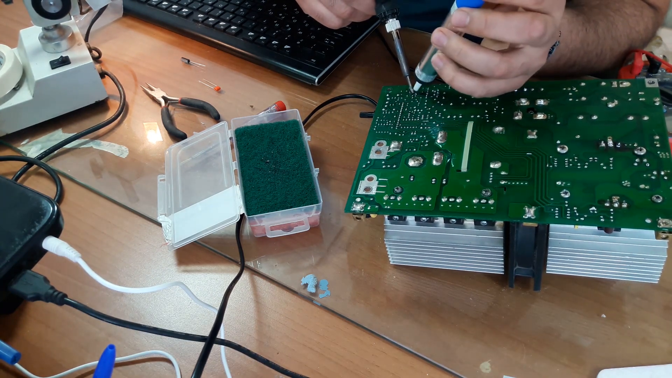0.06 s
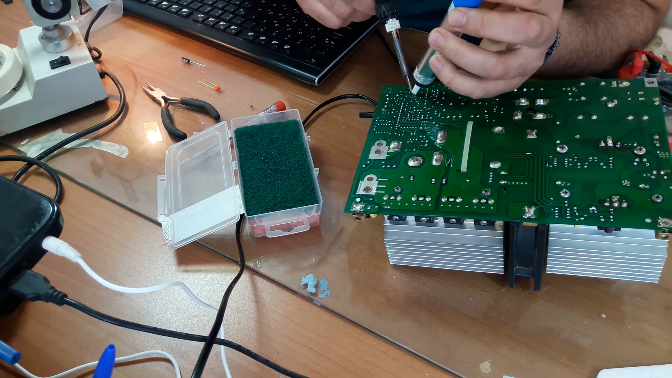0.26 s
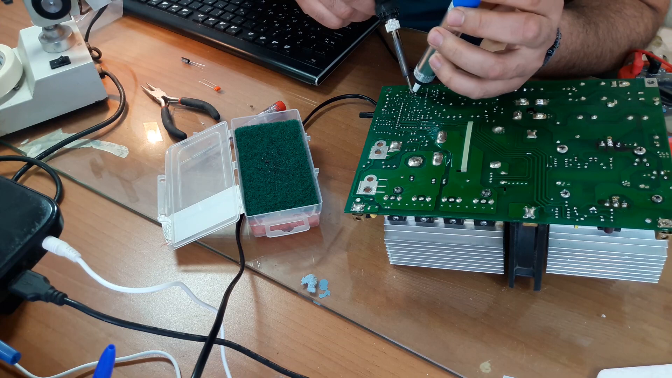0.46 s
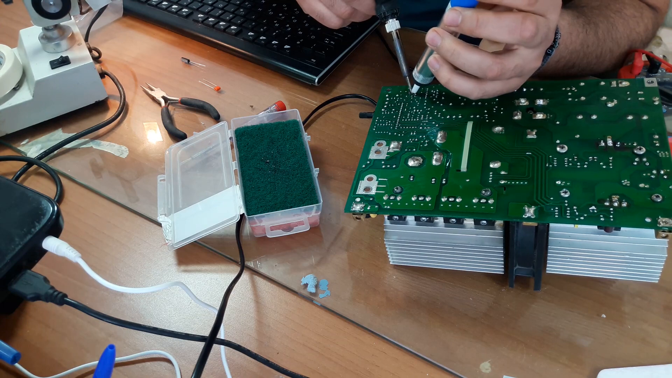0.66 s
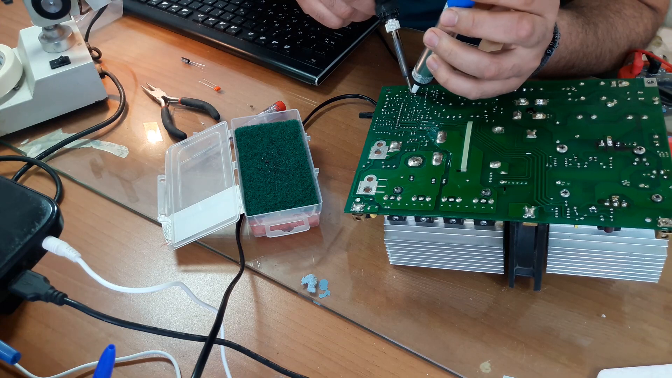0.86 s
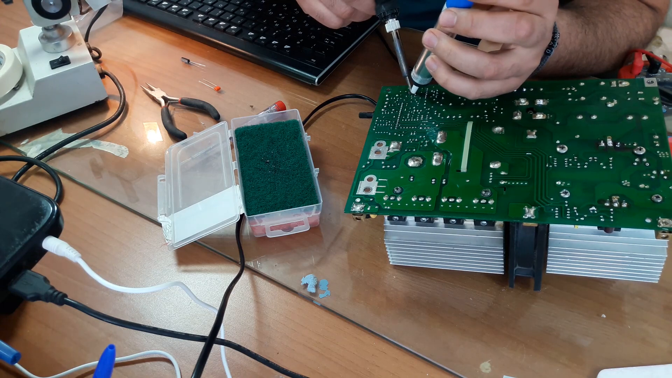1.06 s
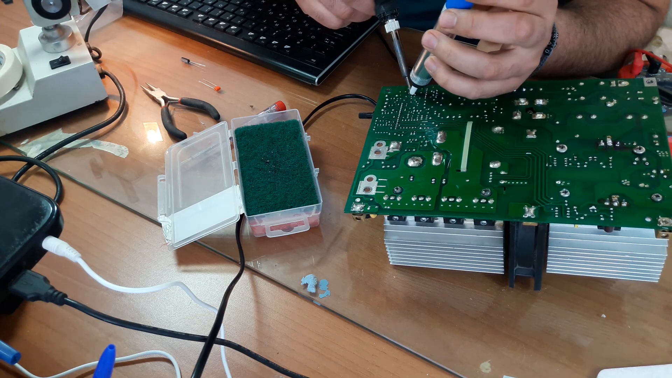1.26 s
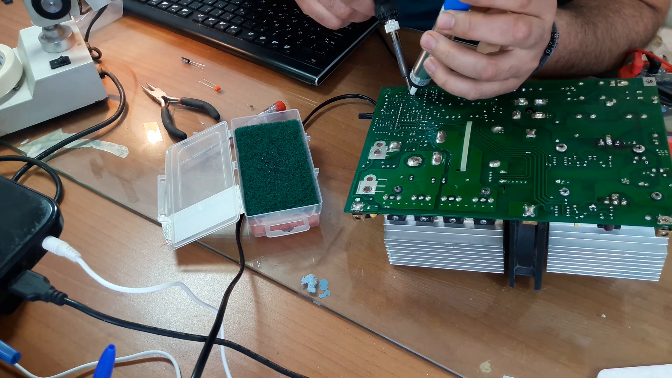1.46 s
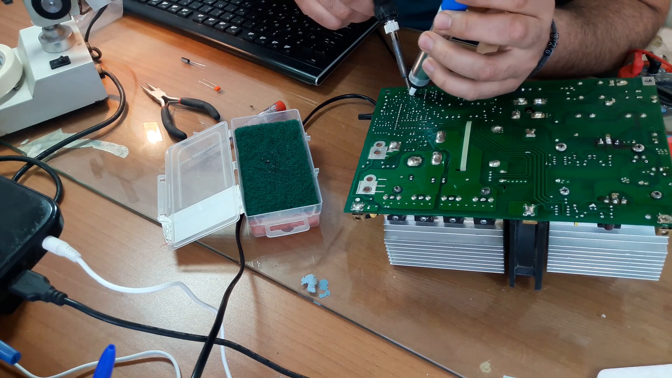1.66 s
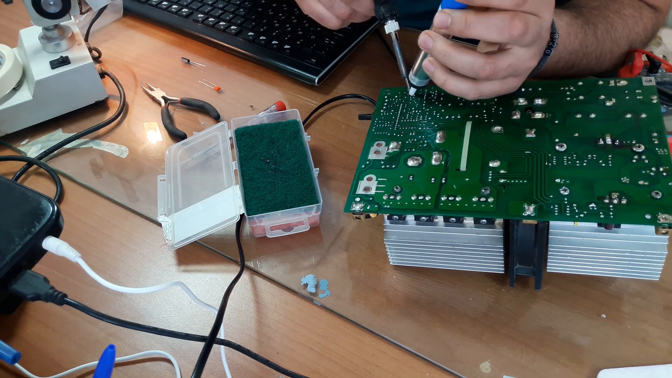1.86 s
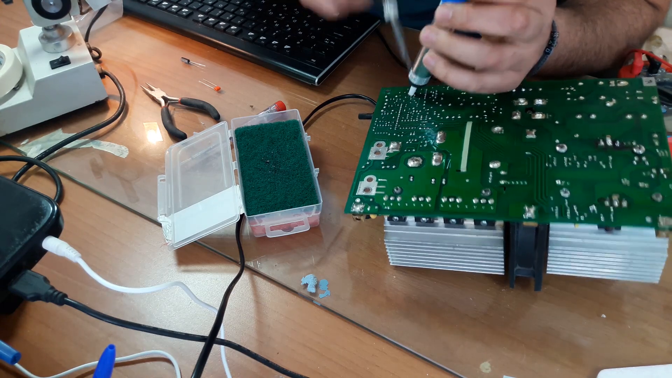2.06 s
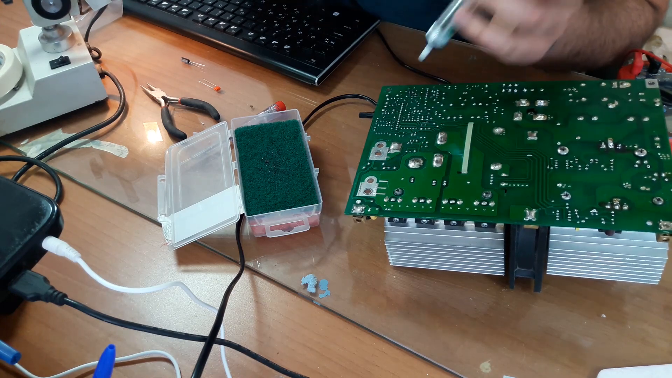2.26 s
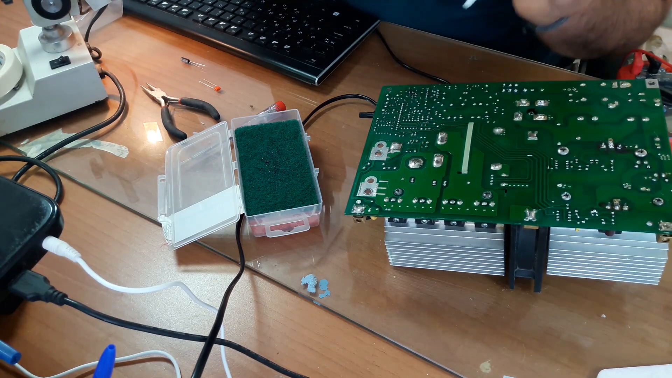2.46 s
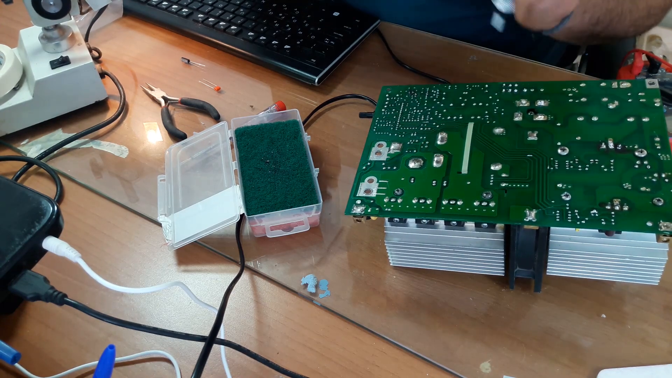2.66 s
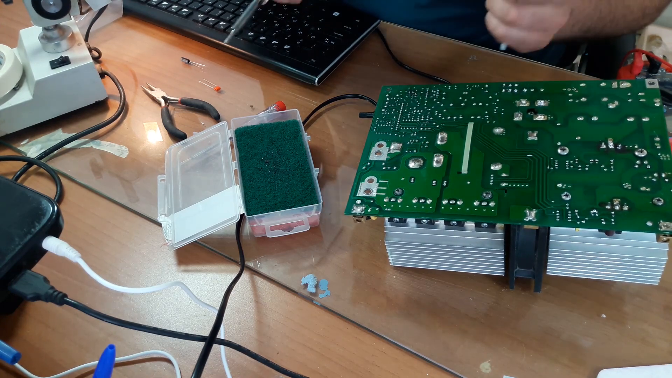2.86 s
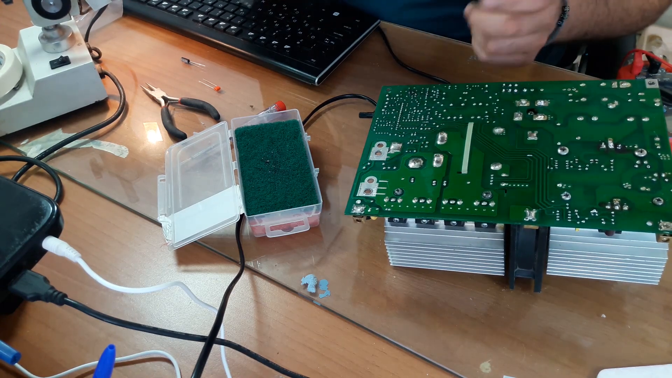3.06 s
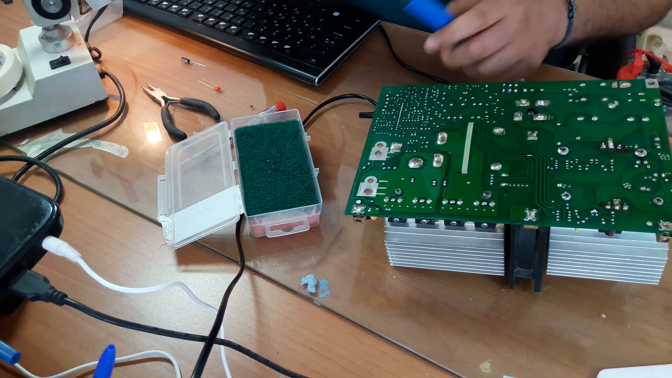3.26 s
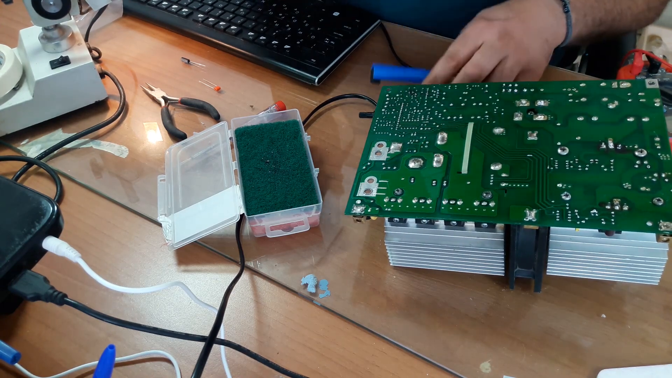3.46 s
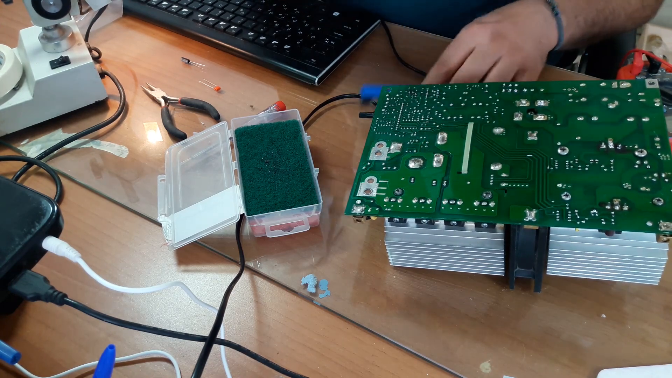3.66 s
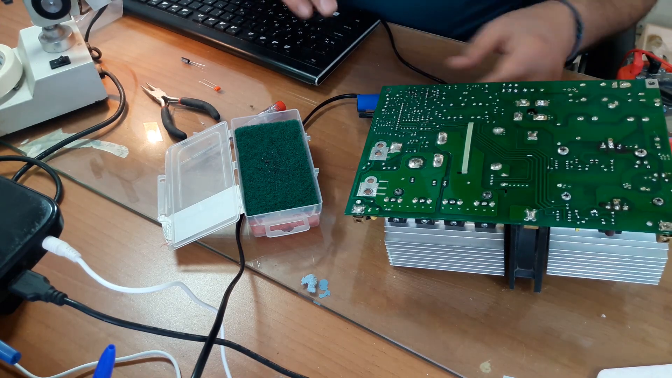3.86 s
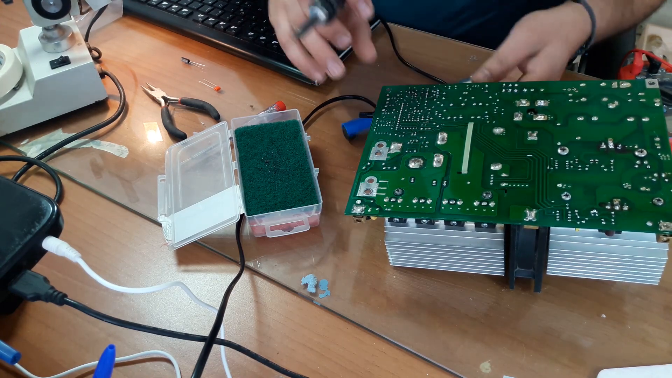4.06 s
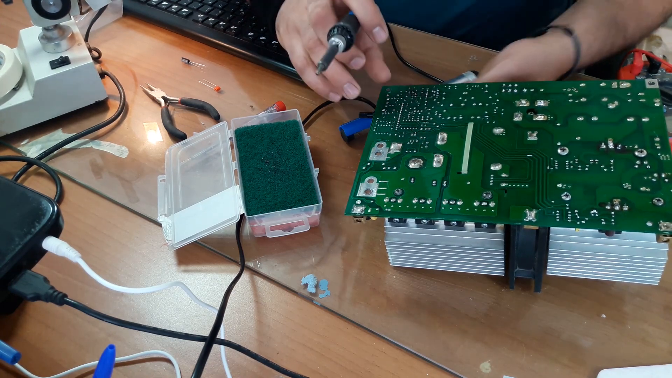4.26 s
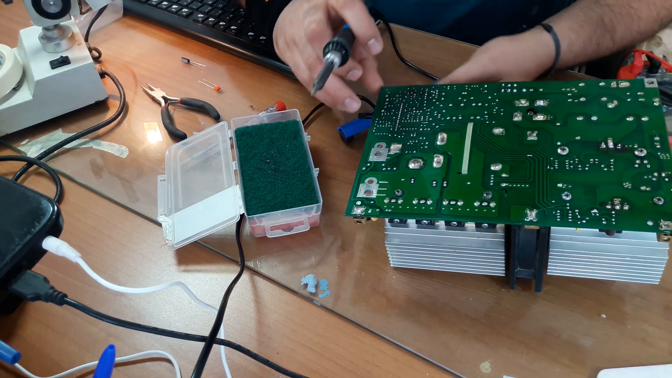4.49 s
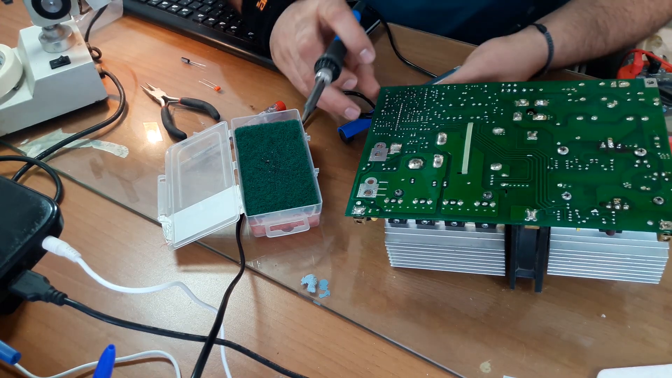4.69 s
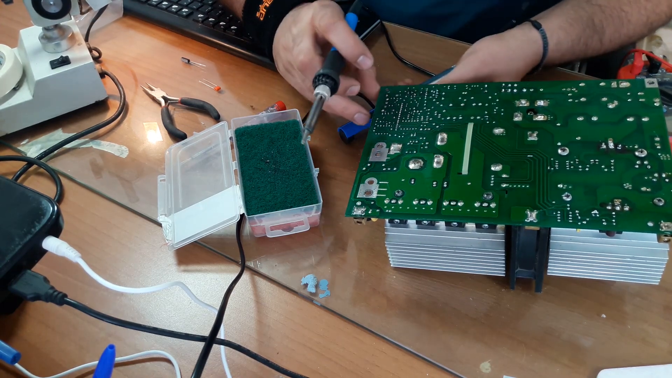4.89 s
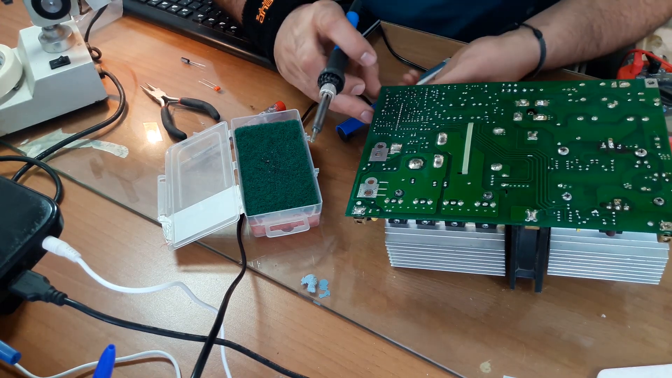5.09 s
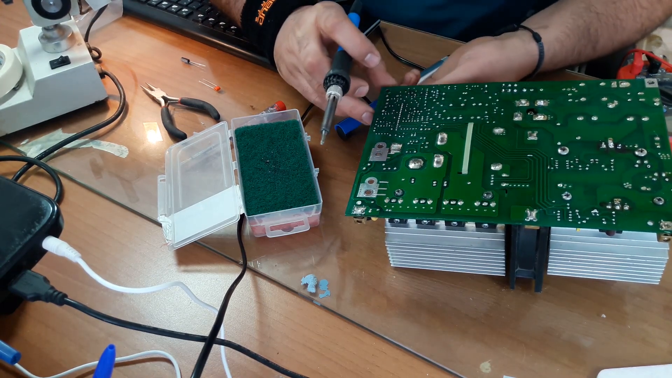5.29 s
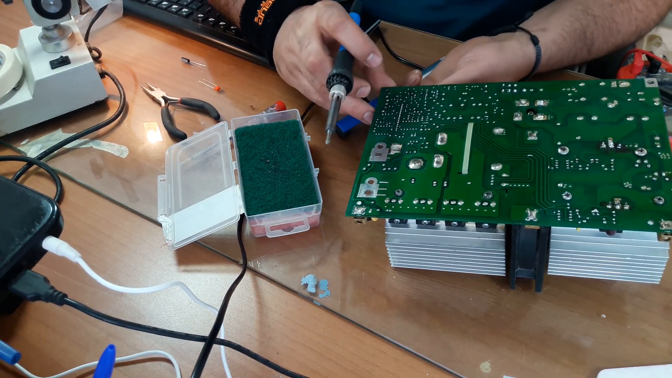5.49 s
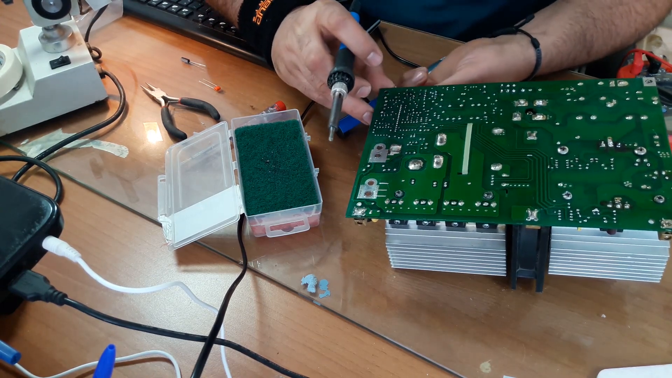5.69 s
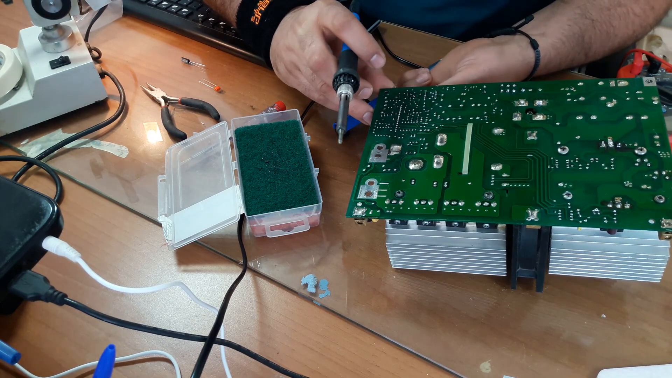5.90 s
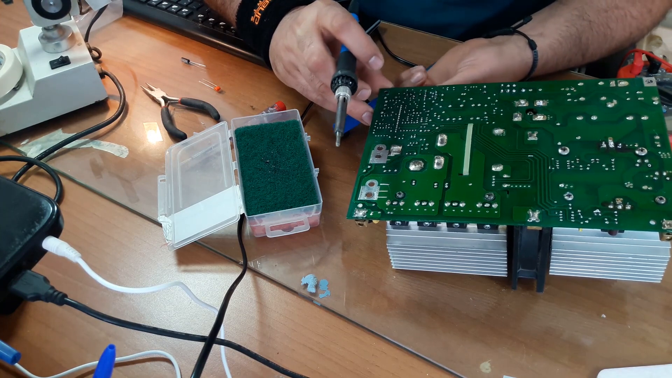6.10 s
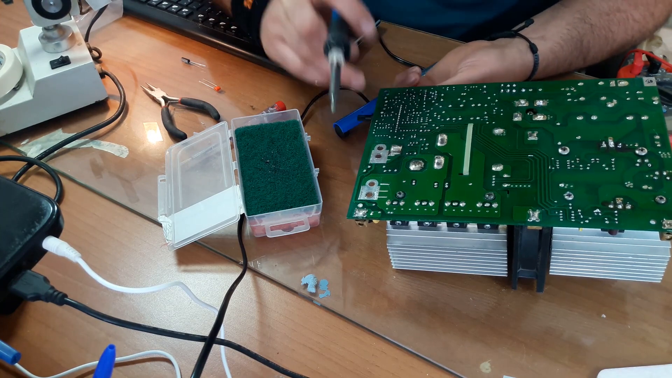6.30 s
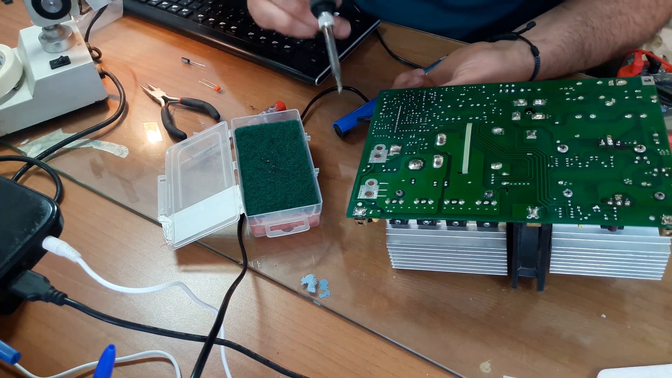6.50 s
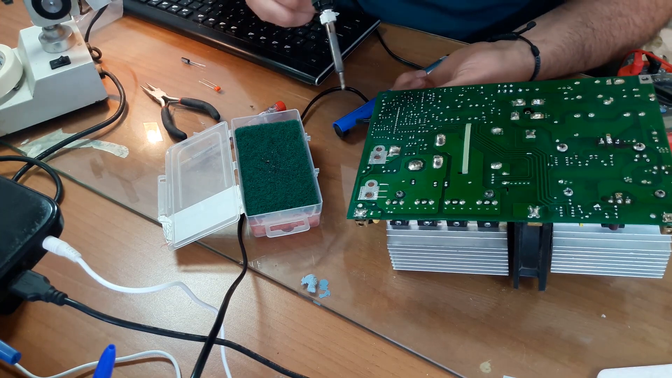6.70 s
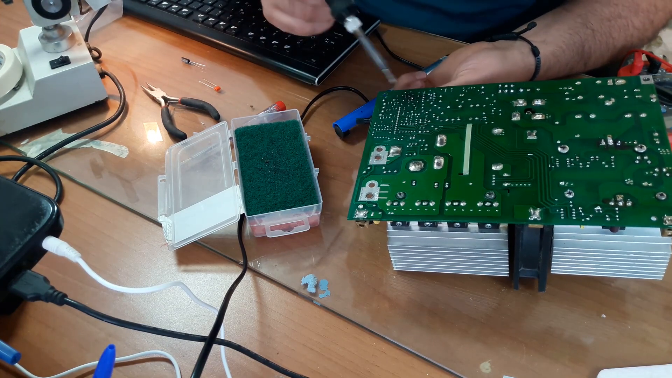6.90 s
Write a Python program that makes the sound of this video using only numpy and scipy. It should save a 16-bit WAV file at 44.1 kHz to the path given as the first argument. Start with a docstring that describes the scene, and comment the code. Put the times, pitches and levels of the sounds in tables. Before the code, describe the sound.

Close stereo microphone in a small hard room. Two seconds of faint low hum and air, then a spring plunger releases with a very loud, sharp clack and short room ring. Soft dull pushes re-cock it, it is laid on the desk with a hollow knock, and another tool is picked up with small clicks, a board knock and faint metallic pings before quiet returns.

```python
"""At a workbench in a small hard room, a spring-loaded solder sucker is fired close to a two-port microphone.
The catch rattles free and the plunger slams its stop; it is pushed in again and laid on the desk.
A tool is picked up with small clicks, ticks, knocks and pings: each blow is a push with chatter that rings
a coloured body, answered by wall echoes and a diffuse tail. Under all lie shaped noise for a wavering
low hum, room air, rustle and microphone hiss, and a few brief narrow whistles and scrapes."""
import sys
import numpy as np
from scipy import signal
from scipy.fft import rfft, irfft, next_fast_len
from scipy.io import wavfile
from scipy.ndimage import uniform_filter1d

SR = 44100
rng = np.random.default_rng(int(sys.argv[2]) if len(sys.argv) > 2 else 0)


def wrap_up_sound(samples):
    """Save the sound to the file named by the first command line argument, as 16-bit audio."""
    columns = np.atleast_2d(samples).T
    # keep every value between -1 and 1, then stretch to whole-number steps
    tamed = np.clip(columns, -1, 1)
    steps = np.round(tamed * 32767).astype(np.int16)
    wavfile.write(sys.argv[1], SR, steps)


def gain_from_db(level_db):
    """Convert decibel levels to linear amplitude factors (20 dB per decade)."""
    decades = np.asarray(level_db, float) / 20
    return 10 ** decades


N = 306142  # samples in the scene
LEFT_DB = -0.9  # the left port is a little less sensitive: this on the left, its opposite on the right


def unit(x):
    """Scaled to rms 1."""
    return x / np.sqrt(np.mean(x ** 2) + 1e-20)


def along(points, hz):
    """A curve through (Hz, value) points, straight on a log frequency axis."""
    f, v = np.transpose(points)
    return np.interp(np.log(hz + 1), np.log(f + 1), v)


def curves(rows):
    """One value per sample for each column after the time."""
    s, *columns = np.transpose(rows)
    t = np.arange(N) / SR
    return [np.interp(t, s, column) for column in columns]


def filtered(x, response):
    """x times a complex response of frequency."""
    n = x.shape[-1]
    m = next_fast_len(n + 8192)
    hz = np.fft.rfftfreq(m, 1 / SR)
    return irfft(rfft(x, m) * response(hz), m)[..., :n]


def resonance(hz, width, f):
    """Complex response of one damped mode, 1 at its centre."""
    return 1j * f * width / (hz * hz - f * f + 1j * f * width)


def causal(gain):
    """Minimum-phase impulse response for a gain given on an FFT grid."""
    n = len(gain) - 1
    cepstrum = irfft(np.log(gain + 1e-6))
    cepstrum[1:n] *= 2
    cepstrum[n + 1:] = 0
    return irfft(np.exp(rfft(cepstrum)))[:n]


def pair(n):
    """Diffuse sound at two ports: noises that agree in the bass and part in the treble."""
    # left-right likeness of diffuse sound: [f/Hz, correlation]
    likeness = [(60, 0.93), (130, 0.94), (290, 0.81), (640, 0.58), (1410, -0.16), (3100, -0.01),
                (6820, -0.03), (15000, -0.04)]

    def mid_and_side(hz):
        angle = np.arccos(np.clip(along(likeness, hz), -1, 1)) / 2
        return np.array([np.cos(angle), np.sin(angle)])

    mid, side = filtered(rng.standard_normal((2, n)), mid_and_side)
    return np.array([mid + side, mid - side])


def rush(spectrum, patchy_db):
    """Stereo noise of rms 1, shaped in frequency, with patches of random gain."""
    hz, _, z = signal.stft(pair(N), SR, nperseg=1024)
    patches = uniform_filter1d(rng.standard_normal(z.shape[1:]), 5, 0)
    patches = uniform_filter1d(patches, 6, 1)
    z = z * gain_from_db(along(spectrum, hz)[:, None] + patchy_db * unit(patches))
    return unit(signal.istft(z, SR, nperseg=1024)[1][:, :N])


def narrow(hz, width, n):
    """Stereo noise of rms 1 passed twice through one resonance."""
    return unit(filtered(pair(n), lambda f: resonance(hz, width, f) ** 2))


def contact(chatter_ms, rattle, n):
    """A sharp push and a brief chatter after it, evened out to a flat broad spectrum."""
    ms = np.arange(n) / SR * 1000
    fade = gain_from_db(-20 * (ms / max(chatter_ms, 0.2)) ** 2)
    force = rattle * rng.standard_normal(n) * fade
    force[0] = -1
    broad_power = uniform_filter1d(np.abs(rfft(force, 2 * n)) ** 2, size=80)
    return signal.fftconvolve(force, causal(np.abs(broad_power) ** -0.5))[:n]


def room(n, rise_ms):
    """A diffuse tail that builds up and dies band by band, with a weaker, slower remainder; left energy 1."""
    # decay time of the room: [f/Hz, t60/s]
    decay = [(100, 0.51), (260, .5), (700, 0.45), (1840, 0.5), (4850, 0.49), (12800, .26)]
    # colour of the tail: [f/Hz, gain/dB]
    tail_tone = [(100, 0), (300, 3), (800, 1), (1800, 1.5), (4000, -0.5), (8000, -5.5), (15000, -5.5)]
    late_db, late_pace = -18, 0.47  # start of the remainder; its share of the first decay rate
    hz, t, z = signal.stft(pair(n), SR, nperseg=256)
    fade_db = -60 * t / along(decay, hz)[:, None]
    fade = gain_from_db(fade_db) + gain_from_db(late_db + late_pace * fade_db)
    tone = gain_from_db(along(tail_tone, hz)[:, None])
    tail = signal.istft(z * tone * fade, SR, nperseg=256)[1][:, :n]
    ms = np.arange(n) / SR * 1000
    tail = tail * (1 - np.exp(-(ms / rise_ms) ** 2))
    return tail / np.linalg.norm(tail[0])


def peaks(modes, f):
    """Summed gain of the modes of a struck body."""
    return sum(gain_from_db(db) * np.abs(resonance(hz, width, f)) ** 2 for hz, width, db in modes)


def ports(pan_db, lag_ms, n):
    """Direct path and early wall echoes as impulse responses at the left and right port."""
    # early wall echoes: [delay/ms, level/dB]
    walls = [(4, -16), (7.3, -20), (11, -23), (21, -19), (27, -26.5)]
    near = np.zeros((2, n))
    for delay_ms, wall_db in walls:
        scatter = rng.integers(0, 12, size=2)  # samples, each port its own
        near[[0, 1], round(delay_ms * SR / 1000) + scatter] = gain_from_db(wall_db)
    near = filtered(near, lambda f: 1 / (1 + 1j * f / 3500))  # walls return little treble
    near[:, 0] = 1
    # the sound reaches the right port first
    near[0] = filtered(near[0], lambda f: np.exp(-2j * np.pi * f * lag_ms / 1000))
    # pan_db is left over right, with the port sensitivities taken out
    return near * gain_from_db([[pan_db / 2 - LEFT_DB], [LEFT_DB - pan_db / 2]])


def blows(events, body, pan_db, room_db, lag_ms, rattle, modes=(), sideways=()):
    """Each contact rings the body; walls and room answer anew each time."""
    n, short = SR * 3 // 4, SR // 8
    out = np.zeros((2, N + n))
    f = np.fft.rfftfreq(2 * short, 1 / SR)
    colour = gain_from_db(np.maximum(along(body, f), -130)) + peaks(modes, f)
    far_colour = colour + peaks(sideways, f)
    onset = 1 - np.exp(-np.arange(1, short + 1) / SR / 0.0002)  # the contact stiffens over its first instant
    for s, db, chatter_ms, tilt_db in events:
        slope = gain_from_db(tilt_db * np.log2(np.clip(f, 200, 16000) / 1000))
        push = contact(chatter_ms, rattle, short)
        ring = signal.fftconvolve(push, causal(colour * slope))[:short] * onset
        ring = gain_from_db(db) * ring / np.abs(ring).max()
        near = ports(pan_db, lag_ms, short)
        far = causal(far_colour * slope)
        # room_db: what is sent to the room against the ring, in energy
        far = far * gain_from_db(room_db) * np.linalg.norm(ring) / np.linalg.norm(far)
        here = out[:, round(s * SR):]
        here[:, :short] += signal.fftconvolve(ring[None], near, axes=1)[:, :short]
        here[:, :n] += signal.fftconvolve(far[None], room(n, rise_ms=11.0), axes=1)[:, :n]
    return out[:, :N]


# In the blow tables below, level is the peak of the ring before panning,
# chatter the time in which the rattling falls 20 dB, tilt a slope about 1 kHz.


def low_hum(hum_db):
    """Rumble and hum as shaped noise, with three wavering tones as narrow noise bands."""
    # rumble colour: [f/Hz, gain/dB]
    rumble_colour = [(25, -63), (35, -26), (41, 0.5), (55, 0), (70, -15), (120, -60)]
    # hum colour: [f/Hz, gain/dB]
    hum_colour = [(45, -61), (58, -18), (70, -14), (91, -1), (151, -3), (221, -11.5), (260, -24),
                  (340, -47.5)]
    # wavering of the three tones: [t/s, low level/dB, middle level/dB, high level/dB]
    wavering = [(0.0, -78, -59, -57.5), (0.7, -73, -59.5, -60), (1.5, -65.5, -62, -76.5),
                (2.2, -63.5, -57, -70), (2.8, -74, -81, -78), (4.601, -74, -71.5, -69.5),
                (5.1, -74, -73, -75), (5.5, -67, -65, -72.5), (6.43, -66, -57, -78.5),
                (6.94, -70, -77, -63)]
    # the three tones, low to high: [f/Hz, width/Hz]
    tones = [(102, 2.8), (143, 16), (166, 17)]
    drone = sum(gain_from_db(db) * narrow(hz, width, N) for db, (hz, width) in zip(curves(wavering), tones))
    rumble = gain_from_db(-67) * rush(rumble_colour, patchy_db=0.5)
    return drone + rumble + gain_from_db(hum_db) * rush(hum_colour, patchy_db=2.0)


def room_air(air_db):
    """Air and a patchier rustle, shaped noises that rise and fall together."""
    # air colour: [f/Hz, gain/dB]
    air_colour = [(120, -29.5), (200, 3), (220, -10), (300, -3.5), (529, -9), (642, -10), (700, -8.5),
                  (2000, -19.5), (2600, -53), (4400, -120)]
    # rustle colour: [f/Hz, gain/dB]
    rustle_colour = [(710, -27), (1200, -7.5), (2210, -5.5), (2990, -10), (3500, -11.5), (5380, -20),
                     (8000, -25.5), (10400, -51), (17600, -120)]
    rustle = gain_from_db(-8.5) * rush(rustle_colour, patchy_db=2.1)  # against the air
    return gain_from_db(air_db) * (rush(air_colour, patchy_db=0.4) + rustle)


def hiss():
    """Steady microphone hiss, mostly treble."""
    # hiss colour: [f/Hz, gain/dB]
    hiss_colour = [(2940, -30.5), (5000, -10), (8750, -10.5), (11500, 0), (15100, 3), (16000, -6)]
    return gain_from_db(-77) * rush(hiss_colour, patchy_db=0.3)


def background():
    """The place at rest: hum and air follow slow level curves over steady hiss."""
    # levels of the place, rms: [t/s, hum level/dB, air level/dB]
    bed = [(0.0, -56, -62.5), (0.4, -62.5, -63), (1.9, -62, -63.5), (2.2, -55.5, -59.5),
           (2.8, -58.5, -61.5), (3.35, -63.5, -61.5), (3.9, -59.5, -60.5), (4.2, -54.5, -59.5),
           (4.65, -61, -59.5), (5.0, -59, -62), (6.0, -61, -62.5), (6.7, -60, -61), (6.94, -57, -61.5)]
    hum_db, air_db = curves(bed)
    return low_hum(hum_db) + room_air(air_db) + hiss()


def whistles():
    """Brief whistles and scrapes: narrow bands of noise that swell, hold and fade."""
    # whistles and scrapes: [start t/s, held until t/s, f/Hz, width/Hz, level/dB]
    bands = [(1.7, 1.848, 487, 23, -69), (2.478, 2.6, 6600, 550, -75.5), (2.6, 2.68, 4750, 500, -78),
             (2.6, 2.68, 2450, 250, -71.5), (3.57, 3.66, 6000, 140, -82.5), (5.95, 6.115, 528, 43, -65.5),
             (6.58, 6.77, 524, 14, -65), (6.63, 6.68, 2700, 1200, -69)]
    swell_s, fade_db_per_s = 0.015, 62
    n = SR // 2
    out = np.zeros((2, N + SR))
    t = np.arange(n) / SR
    for start, held, hz, width, db in bands:
        swell = np.minimum(t / swell_s, 1)
        fade = gain_from_db(db - fade_db_per_s * np.maximum(t + start - held, 0))
        closing = np.cos(np.pi * t)  # reaches silence at half a second
        out[:, round(start * SR):][:, :n] += swell * fade * closing * narrow(hz, width, n)
    return out[:, :N]


def catch():
    """The catch rattles free: long, strong chatter on a bright latch."""
    # catch contacts: [t/s, level/dB, chatter/ms, tilt/dB per octave]
    releases = [(1.9952, -22, 2.5, 8), (1.9970, -13, 4.6, 2), (2.0027, -21, 2.7, -6)]
    # latch colour: [f/Hz, gain/dB]
    latch = [(88, -20), (300, -2.5), (700, -11), (1400, -3), (2000, -1.5), (3300, -8), (4400, -3.5),
             (8000, -3), (10500, -8.5), (13000, -10.5), (16000, -20.5)]
    return blows(releases, latch, pan_db=4, room_db=-5.5, lag_ms=0.055, rattle=0.85)


def thuds():
    """Low thuds through the desk, nearly without chatter."""
    # thuds: [t/s, level/dB, chatter/ms, tilt/dB per octave]
    bumps = [(2.014, -33.5, 2.3, 3), (2.203, -43.5, 3, 14.5), (2.259, -44, 3, 9.5), (2.296, -45.5, 3, 10.5),
             (4.592, -44, 2, 5.5), (4.728, -38.5, 2, -4.5)]
    # desk colour: [f/Hz, gain/dB]
    desk = [(40, -26), (78, -9), (95, 4), (112, -14.5), (125, -13.5), (170, -21.5), (235, -11.5),
            (310, -19), (450, -37), (1500, -69), (16000, -125)]
    return blows(bumps, desk, pan_db=-4.0, room_db=-5, lag_ms=0.01, rattle=0.019)


def plunger():
    """The plunger slams its stop and rebounds, ringing the modes of the barrel."""
    # slam and rebounds: [t/s, level/dB, chatter/ms, tilt/dB per octave]
    slams = [(2.0150, -2, 5.7, 0), (2.0345, -27.5, 2.3, 0), (2.041, -25.5, 5, -1.3), (2.051, -21, 4, -0.4)]
    # barrel colour: [f/Hz, gain/dB]
    barrel = [(88, -40.5), (150, -16), (280, -10), (520, -21.5), (1100, -21), (2600, -15), (3400, -26),
              (4400, -17), (6500, -23), (8400, -27), (12500, -27), (16000, -32)]
    # barrel modes: [f/Hz, width/Hz, level/dB]
    barrel_modes = [(852, 245, -1), (1249, 160, -7.5), (1833, 150, -3.5), (2123, 148, -8.5),
                    (3020, 110, -15.5)]
    # further modes radiate sideways and are heard only through the room: [f/Hz, width/Hz, level/dB]
    side_modes = [(654, 270, -18), (900, 69, -11), (1257, 72, 0.5), (1420, 100, -3), (2230, 100, -11)]
    return blows(slams, barrel, pan_db=-3.5, room_db=-9.5, lag_ms=0.049, rattle=0.16,
                 modes=barrel_modes, sideways=side_modes)


def tip_ticks():
    """Light ticks of a tip, with strong chatter."""
    # ticks: [t/s, level/dB, chatter/ms, tilt/dB per octave]
    touches = [(2.196, -36.5, 6.6, -5), (3.902, -57, 2.8, 8), (4.068, -54, 8, 7), (4.245, -39, 8.2, 2),
               (4.419, -56, 6, 3), (4.572, -54, 8, -3), (5.226, -49.5, 9.4, 5), (5.285, -56, 6, -4),
               (6.252, -56, 18.5, 3)]
    # tip colour: [f/Hz, gain/dB]
    tip = [(800, -37), (1500, -6), (2000, -12.5), (2800, 2.5), (3500, -16), (4500, -6.5), (5600, -22),
           (7500, -21), (16000, -48.5)]
    return blows(touches, tip, pan_db=-4, room_db=-11.5, lag_ms=0.035, rattle=0.52)


def reloading():
    """The plunger is pushed in against its spring: dull contacts through the grip."""
    # reloading contacts: [t/s, level/dB, chatter/ms, tilt/dB per octave]
    pushes = [(2.489, -42, 2, 0), (2.513, -37, 2.2, 0), (2.536, -34, 2.8, 0), (2.567, -33, 1.8, 0)]
    # grip colour: [f/Hz, gain/dB]
    grip = [(100, -28), (220, -1), (315, 10.5), (400, 3.5), (520, -48), (1000, -15), (3000, -52),
            (16000, -73)]
    return blows(pushes, grip, pan_db=-3.0, room_db=-14.5, lag_ms=0.054, rattle=0.079)


def board_knocks():
    """Knocks on the circuit board."""
    # knocks: [t/s, level/dB, chatter/ms, tilt/dB per octave]
    knocks = [(2.572, -38.5, 6.4, -4), (4.7125, -29.5, 8.6, 0), (5.228, -50.5, 3.5, 1)]
    # board colour: [f/Hz, gain/dB]
    board = [(150, -23), (250, -6.5), (486, -15.5), (720, -5), (1070, -2.5), (1390, -11.5), (1990, -20),
             (2840, -14), (3280, -27), (4690, -21.5), (9570, -34), (12000, -28), (15600, -70),
             (22000, -120)]
    return blows(knocks, board, pan_db=-4.5, room_db=-9.5, lag_ms=0.056, rattle=0.09)


def laying_down():
    """The sucker is laid on the desk and its tube rings."""
    # laying down: [t/s, level/dB, chatter/ms, tilt/dB per octave]
    landing = [(3.7068, -21.5, 7.1, 0)]
    # tube colour: [f/Hz, gain/dB]
    tube = [(88, -37), (150, -15), (383, -7.5), (448, -17), (675, -3), (745, -13), (805, -5), (1080, -5),
            (1630, -1), (2060, -6.5), (3290, -23.5), (3620, -29), (16000, -44.5)]
    return blows(landing, tube, pan_db=-4.0, room_db=-6.0, lag_ms=0.044, rattle=0.24)


def tool_clicks():
    """Small clicks of a tool being picked up."""
    # clicks: [t/s, level/dB, chatter/ms, tilt/dB per octave]
    clicks = [(3.7965, -37.5, 2.5, -1.5), (4.1492, -22, 7.8, 0.5), (4.403, -45, 1.8, 9),
              (4.407, -41.5, 38, -4.5)]
    # tool colour: [f/Hz, gain/dB]
    tool = [(180, -32), (300, -8), (494, -18.5), (749, -20.5), (1210, -11), (1510, -2.5), (1780, -9),
            (2930, -4.5), (3400, -16), (4670, -9), (5520, -13), (9000, -20), (15000, -31.5), (16000, -32.5)]
    return blows(clicks, tool, pan_db=-3.5, room_db=-6.0, lag_ms=0.026, rattle=0.32)


def sink_pings():
    """Pings of the board's heat sink: a few narrow, slowly dying modes."""
    # pings: [t/s, level/dB, chatter/ms, tilt/dB per octave]
    pings = [(4.411, -49, 6, -7.5), (4.714, -41.5, 2, 14)]
    # heat sink colour: [f/Hz, gain/dB]
    sink = [(300, -45), (900, -21), (2000, -63), (16000, -125)]
    # heat sink modes: [f/Hz, width/Hz, level/dB]
    sink_modes = [(684, 23, 6), (1009, 12, -1), (1246, 39, -13)]
    return blows(pings, sink, pan_db=-5.0, room_db=-16.5, lag_ms=0.065, rattle=0.03, modes=sink_modes)


def scene():
    """Everything at the bench."""
    place = background() + whistles()
    pump = catch() + plunger() + reloading() + laying_down()
    bench = thuds() + tip_ticks() + board_knocks() + tool_clicks() + sink_pings()
    return place + pump + bench


def band_limit(x):
    """A steep low-pass at the top of the band."""
    return signal.sosfilt(signal.butter(12, 16680, fs=SR, output="sos"), x)


def record(dry):
    """Unequal microphone ports, no deep bass, and an input stage that rounds off large swings."""
    heard = dry * gain_from_db([[LEFT_DB], [-LEFT_DB]])
    heard = filtered(heard, lambda f: (1j * f / (32 + 1j * f)) ** 3)  # three low cuts at 32 Hz
    top = 0.72  # swings approach this share of full scale
    mix = heard / (1 + (heard / top) ** 6) ** (1 / 6)
    return band_limit(mix)


dry = scene()
out = record(dry)
wrap_up_sound(out)
```